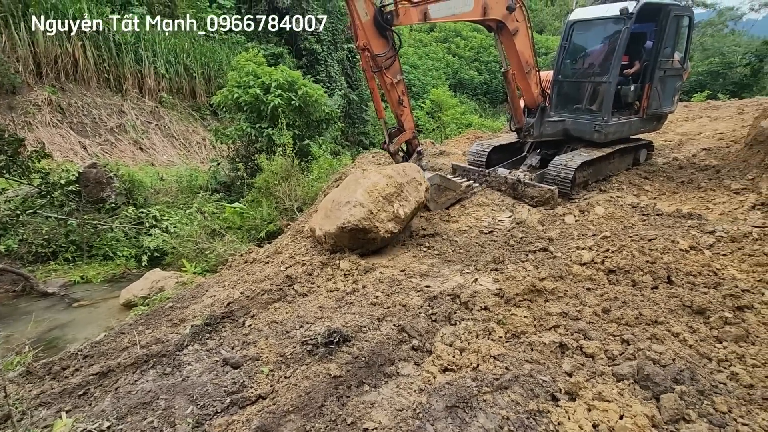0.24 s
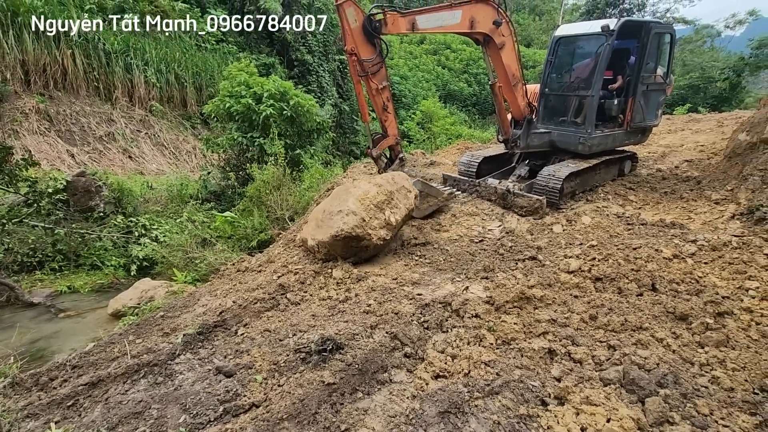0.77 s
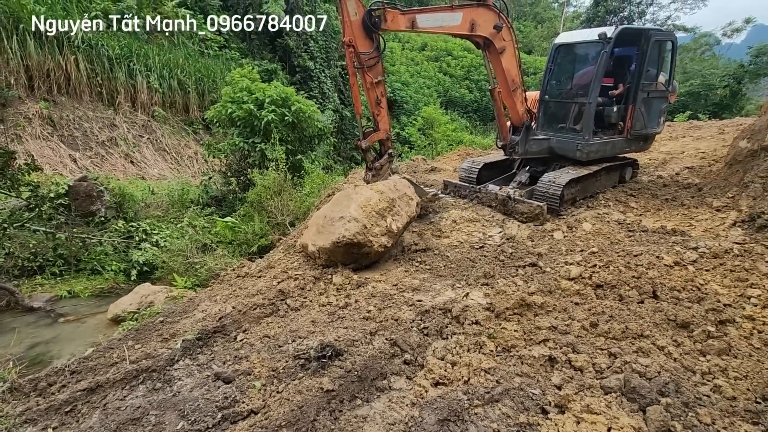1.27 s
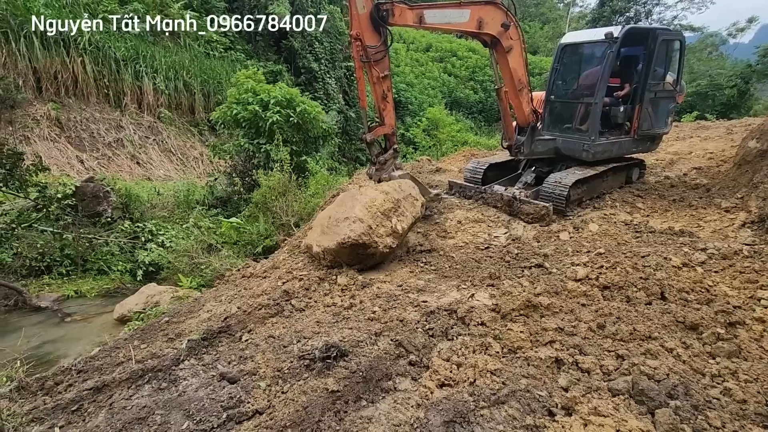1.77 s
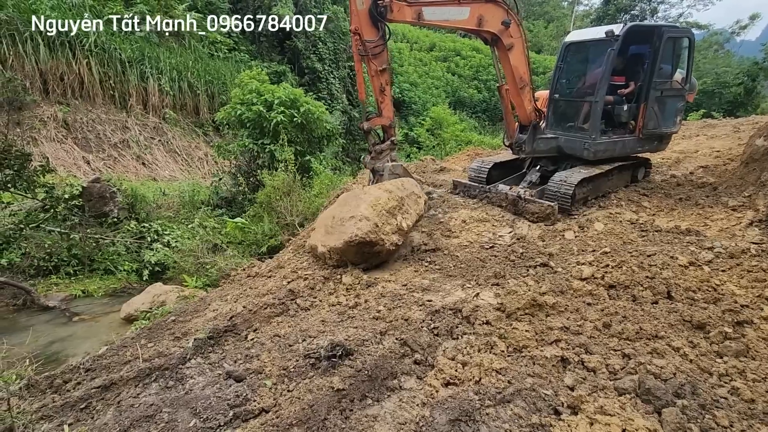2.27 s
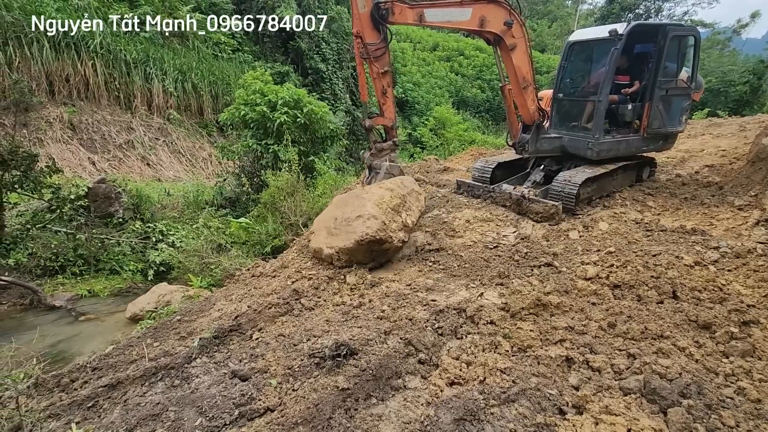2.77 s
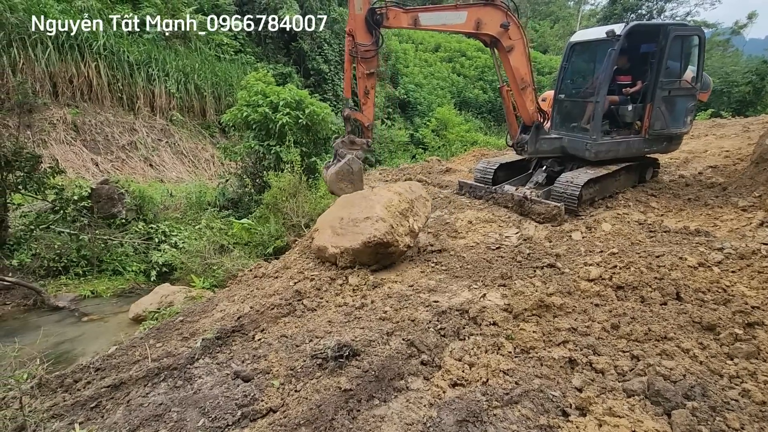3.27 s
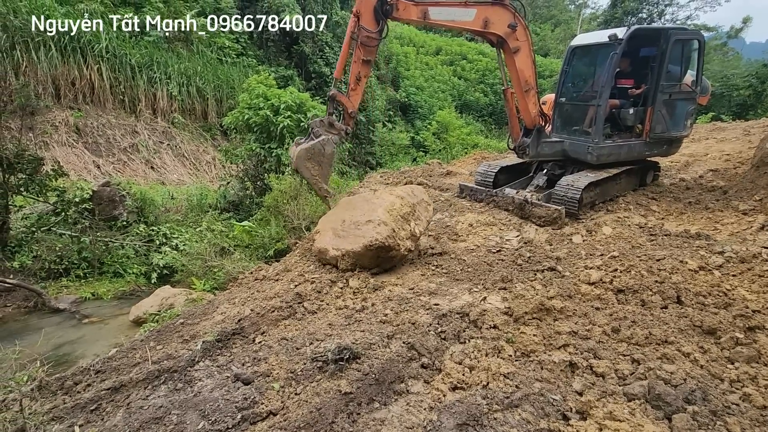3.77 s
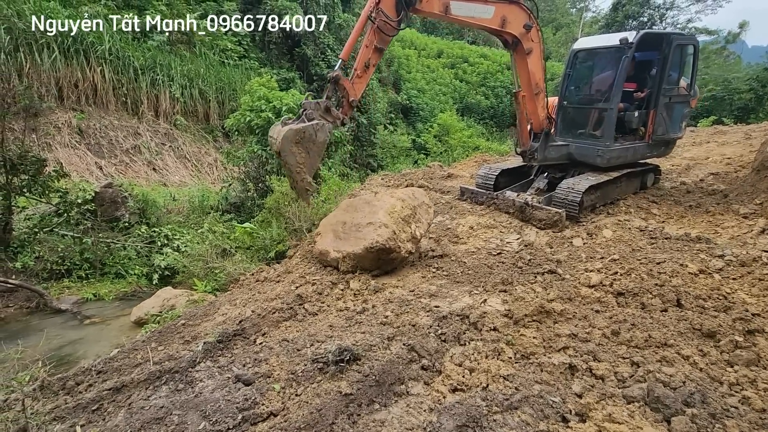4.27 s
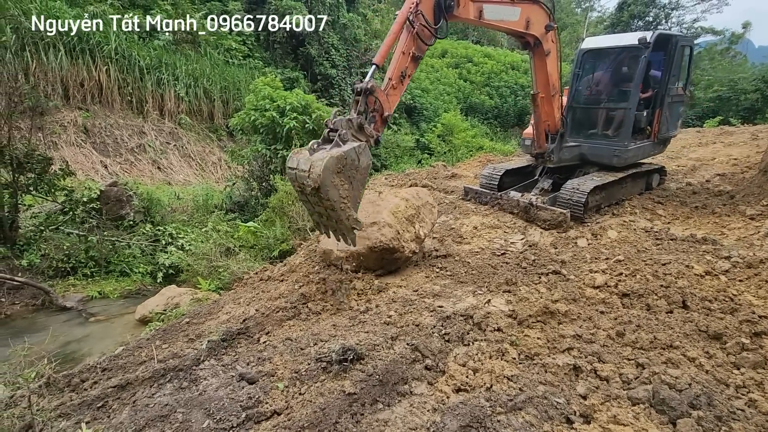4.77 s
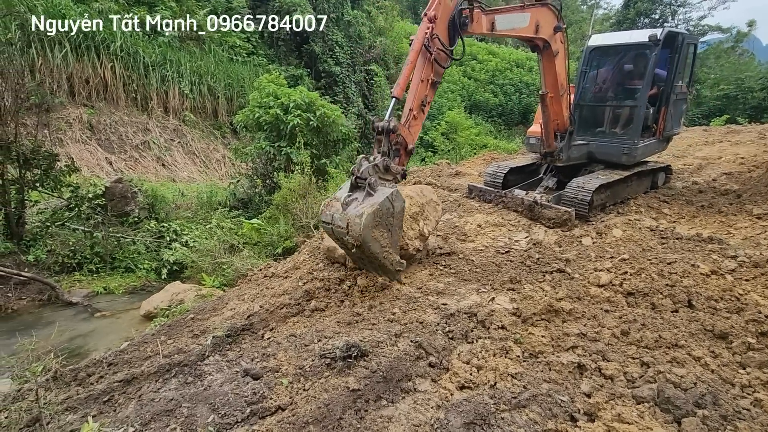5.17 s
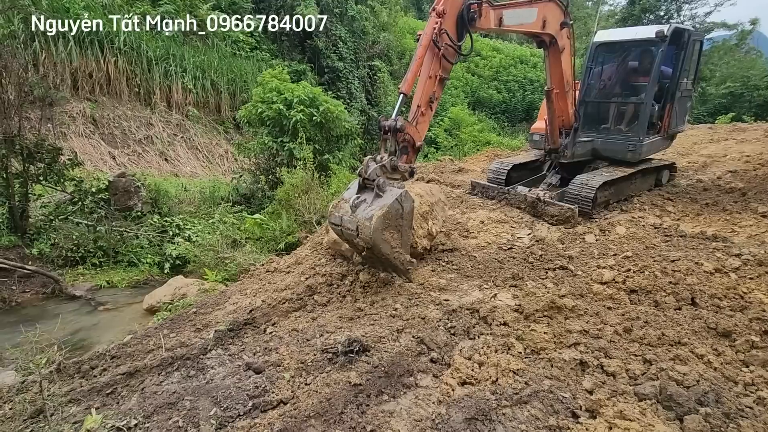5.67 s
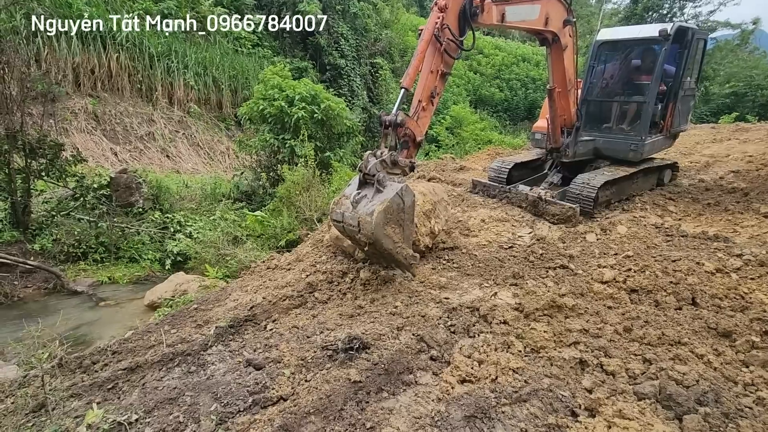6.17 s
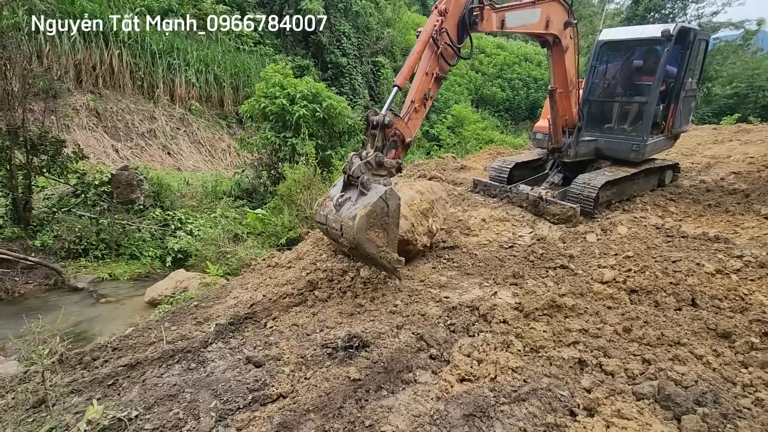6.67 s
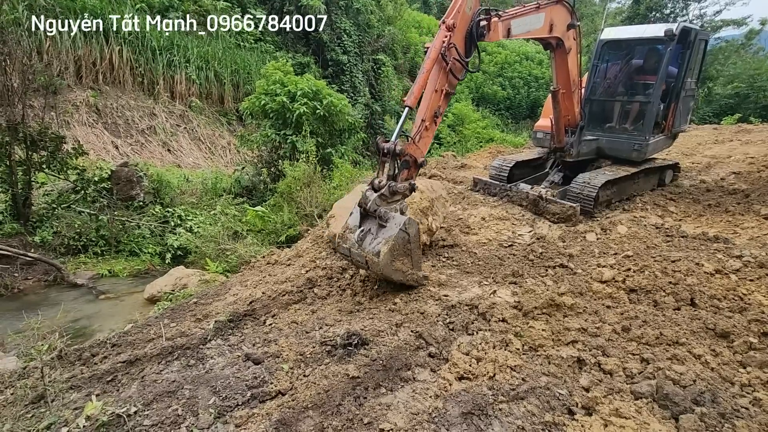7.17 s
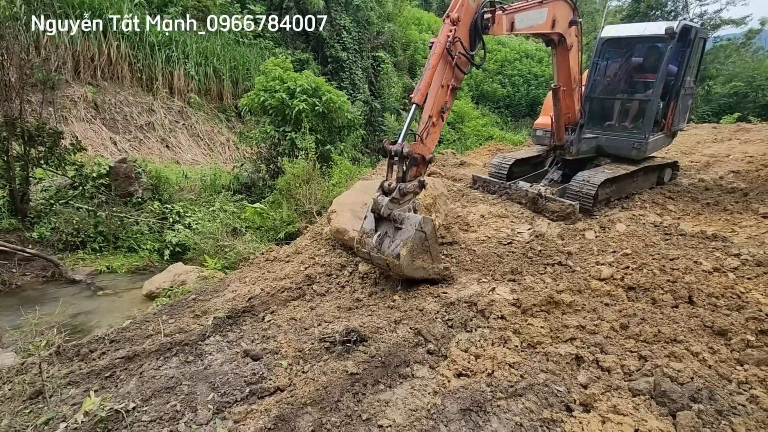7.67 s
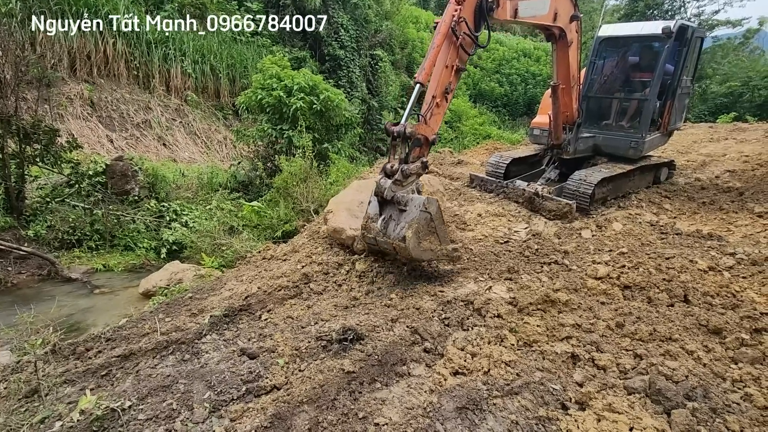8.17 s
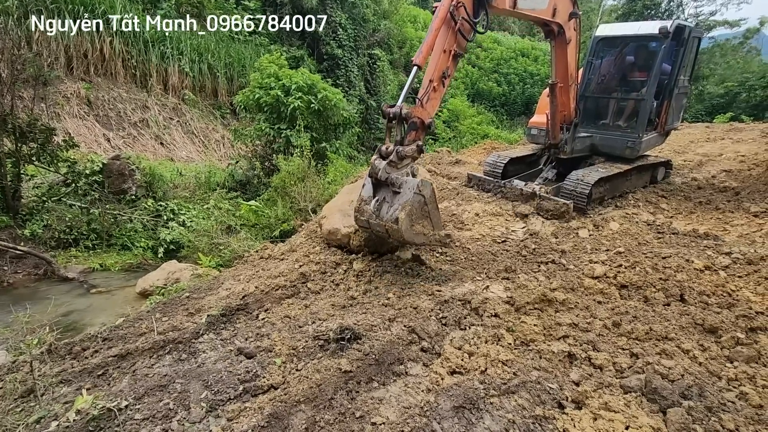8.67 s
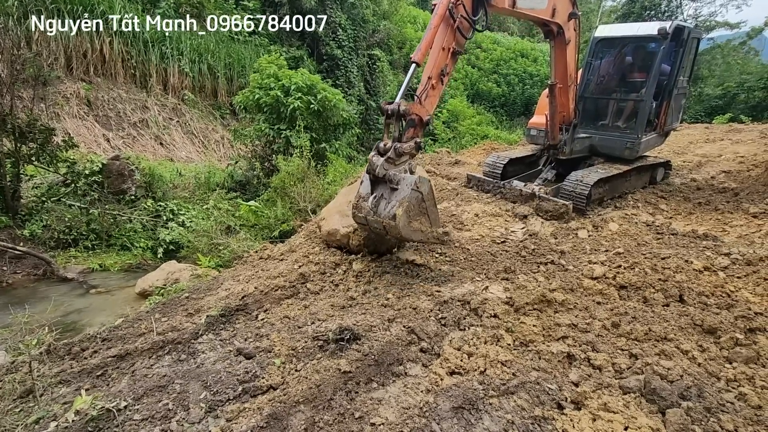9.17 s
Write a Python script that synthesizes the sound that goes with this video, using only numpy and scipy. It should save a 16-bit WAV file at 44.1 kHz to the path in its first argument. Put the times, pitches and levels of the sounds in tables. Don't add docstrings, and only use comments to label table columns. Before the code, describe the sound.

Stone crunches and scrapes on a steel bucket in irregular bursts, dull thumps hitting soil, over a constant low diesel drone and faint water hiss.

```python
import sys
import numpy as np
from scipy import signal
from scipy.fft import rfft, irfft, next_fast_len
from scipy.io import wavfile
from scipy.ndimage import uniform_filter1d

SR = 44100
rng = np.random.default_rng(int(sys.argv[2]) if len(sys.argv) > 2 else 0)


def transcribe(signal):
    frames = np.atleast_2d(signal).T
    limited = np.clip(frames, -1, 1)
    pcm = np.round(limited * 32767).astype(np.int16)
    wavfile.write(sys.argv[1], SR, pcm)


def elevation(decibels):
    levels = np.asarray(decibels, float)
    return 10 ** (levels / 20)


N = 415863

# [start_s, level_db]
EFFORT = [(0, -40), (.45, -46.5), (.89, -32), (1.42, -39.5), (1.7, -42), (2.1, -38.5), (2.55, -41.5),
          (3.31, -40), (4.0, -45), (4.5, -42.5), (5.99, -48), (6.8, -37), (7.01, -41), (8.03, -45),
          (8.2, -22), (8.38, -42.5), (8.74, -51), (9.43, -47.5)]
# [freq_hz, density_db per Hz]
RUMBLE = [(60, -60.5), (90, -39), (120, -4.5), (170, 3), (230, 1.5), (340, -12), (450, -11.5), (600, -34),
          (1500, -100)]


def curve(rows, column):
    rows = np.array(rows)
    return np.interp(np.arange(N) / SR, rows[:, 0], rows[:, column])


def read(points, hz):
    f, value = np.transpose(points)
    return np.interp(np.log(hz + 1), np.log(f + 1), value)


def evened(x):
    return x / np.sqrt(np.mean(x ** 2) + 1e-20)


def add(mix, s, sound):
    part = mix[..., round(s * SR):][..., :sound.shape[-1]]
    part += sound[..., :part.shape[-1]]


def white():
    return rng.standard_normal((2, N))


def wander(rate_hz, channels=1):
    count = N // 16 + 99
    size = next_fast_len(count)
    slope = 1 / (1 + (np.fft.rfftfreq(size, 16 / SR) / rate_hz) ** 4)
    coarse = irfft(rfft(rng.standard_normal((channels, size))) * slope)
    return evened(np.array([np.interp(np.arange(N) / 16, np.arange(len(row)), row) for row in coarse]))


def colour(x, points):
    level_db = read(points, abs(np.fft.fftfreq(8192, 1 / SR)))
    log_gain = np.log(elevation(np.maximum(level_db, -100)))
    taps = np.fft.ifft(np.exp(log_gain - 1j * signal.hilbert(log_gain).imag)).real[:4096]
    return signal.oaconvolve(x, taps[None] / np.linalg.norm(taps), axes=1)[:, :N]


def ring(x, hz, t60):
    r = 1000 ** (-1 / (max(t60, .004) * SR))
    poles = [1, -2 * r * np.cos(2 * np.pi * hz / SR), r * r]
    return np.sqrt((1 - r) / 2) * signal.lfilter([1, 0, -1], poles, x)


def patchy(x, depth_db):
    z = signal.stft(x, nperseg=256, noverlap=128)[2]
    field = rng.standard_normal(z.shape[1:])
    field = uniform_filter1d(uniform_filter1d(field, size=3, axis=0), size=5, axis=1)
    return signal.istft(z * elevation(depth_db * evened(field)), nperseg=256, noverlap=128)[1][:, :N]


def engine():
    # [start_s, firing_hz, level_db of the firing tone]
    running = [(0.0, 90.2, -25), (0.76, 85.0, -19.5), (1.0, 86.8, -23.5), (1.68, 85.8, -22),
               (1.78, 84.7, -21.5), (3.07, 84.66, -21.5), (3.18, 88, -22.5), (4.33, 87.8, -23),
               (4.62, 90.96, -21.5), (5.36, 94.2, -28), (5.67, 85.45, -22.5), (6.77, 92, -23),
               (6.93, 93.5, -28.5), (7.45, 93, -25.5), (7.56, 86.1, -23), (8.09, 83, -19.5),
               (8.19, 82.6, -27), (8.51, 82.6, -22.5)]
    # [multiple of half the firing rate, loaded_db, resting_db]
    orders = [(1, 0.5, -1.5), (1.5, -28, -22), (2, 1, 1), (2.5, -42, -14), (3, -26.5, -26), (4, -24, -34.5),
              (5, -17.5, -53.5), (5.5, -29.5, -41), (6, -34, -24.5), (7, -30, -60), (8, -27, -38),
              (12, -45, -35.5)]
    # [start_s, share 0-1]
    arm_rests = [
        (0, 0),
        (8.4, 0.23),
        (8.8, 0.69),
        (9.43, 0.95),
    ]
    # [start_s, level_db, length_s]
    jolts = [
        (4.6, 4, .06),
        (7.499, -5, 0.064),
        (8.2, -22, .1),
    ]
    half_rate_db, rest_sag_hz = -30, 1.181
    rest = curve(arm_rests, 1)
    firing_hz = curve(running, 1) - rest_sag_hz * rest + .5 * wander(5.51)[0]
    turns = np.cumsum(firing_hz) / (2 * SR)
    waver, out = wander(4.2, channels=4), np.zeros(N)
    half_db = half_rate_db
    for s, db, length in jolts:
        half_db = half_db + db * np.exp(-((np.arange(N) / SR - s) / length) ** 2)
    for i, (k, loaded_db, resting_db) in enumerate(orders):
        level_db = half_db if k == 1 else curve(running, 2)
        level_db = level_db + (1 - rest) * loaded_db + rest * resting_db
        shake = .06 if k in (1, 2) else .5
        tone = np.sqrt(2) * np.cos(2 * np.pi * (k * turns + rng.random()))
        out += elevation(level_db.astype(np.float32)) * (1 + shake * waver[i % 4]) * tone
    return out, turns


def hiss(turns):
    # [freq_hz, density_db per Hz]
    air_spectrum = [(25, -30), (50, 0.5), (110, -4.5), (200, -11.5), (330, -14.5), (480, -22.5), (760, -17),
                    (1200, -23), (1600, -20), (3000, -28.5), (5200, -33), (8000, -40.5), (12000, -48),
                    (16000, -74)]
    gate = 1 + 0.1 * np.cos(4 * np.pi * turns)
    air = colour(white() * gate * elevation(0.77 * wander(45)), air_spectrum)
    air = patchy(air, 1.5)
    middle = signal.sosfilt(signal.butter(4, [500, 6000], "band", fs=SR, output="sos"), air)
    return air / middle.std() * elevation(curve(EFFORT, 1) + 0.5)


def grind():
    effort_share, level_db = 0.86, -5.5
    rumble = colour(white() * elevation(3.2 * wander(6.3)), RUMBLE)
    return rumble * elevation(effort_share * curve(EFFORT, 1) + level_db)


def stream():
    # [freq_hz, density_db per Hz]
    water_spectrum = [(2000, -3), (4000, 1), (5400, -7), (6900, 9.5), (7400, 5), (8400, -1.5),
                      (10800, -6.5), (11600, 1.5), (12600, -2), (16000, -2.5)]
    return elevation(-55.5) * colour(white(), water_spectrum)


def clinks():
    # [freq_hz, level_db, t60_s]
    link_modes = [(7950, -6, .02), (10850, -10, .025), (13400, -21, .02), (14300, -13, .025),
                  (4350, -6, .05), (3150, -10, .02)]
    # [start_s, level_db, low_db of the low modes over the high ones]
    taps = [(.02, -38, 7), (1.1104, -26, -5), (1.155, -34, -4), (1.186, -24.5, -3), (1.2427, -27, 5),
            (1.3548, -34, 2), (1.385, -37.5, 11.5), (1.3982, -36, 6), (1.478, -29, 4), (1.5594, -33.5, 9.5),
            (1.916, -24.5, 6.5), (2.1151, -30, 8), (2.1594, -34, 8), (2.2194, -36, 12), (2.2788, -31.5, 7),
            (2.4886, -40, 14.5), (2.7011, -33, 6), (2.7427, -27, -5), (2.83, -42, 10), (2.09, -42, -10)]
    rattle_t60_s, low_longer, tick_db = .11, 1.8, -17
    t, (hz, db, t60) = np.arange(SR // 5) / SR, np.array(link_modes).T
    low = hz < 6000
    chatter_t60 = (rattle_t60_s * np.where(low, low_longer, 1))[:, None]
    chatter, ticks = np.zeros((len(hz), N)), np.zeros(N)
    for (s, peak_db, low_db), share in zip(taps, rng.standard_normal((len(taps), len(hz)))):
        struck_db = peak_db + db + low_db * low + 3 * share
        add(chatter, s, elevation(struck_db[:, None] - 60 * t / chatter_t60))
        add(ticks, s, elevation(peak_db + tick_db - 60 * t / .03))
    jitter = rng.standard_normal((2, N + 1))
    modes = sum(ring(jitter[:, 1:] * chatter[i], hz[i], t60[i]) for i in range(len(hz)))
    return elevation(-9) * modes + ticks * np.diff(jitter)


def thuds():
    # [start_s, level_db, pitch_hz]
    thumps = [(.062, -10.5, 232.6), (.717, -24.5, 171), (.791, -15.5, 130.5), (.839, -10.5, 180),
              (.898, 5, 168), (.948, -11, 157), (1.031, -12.5, 210.3), (1.093, -6, 174.6),
              (1.262, -23.5, 220), (1.349, -23, 187.2), (1.631, -22.5, 220), (1.713, -17.5, 175),
              (1.994, -17, 169.8), (2.046, -5, 162), (2.153, -8, 172.6), (2.224, -19.5, 206.3),
              (2.614, -19.5, 176.2), (2.954, -10, 186.5), (3.11, 0, 193), (3.18, -7, 197),
              (3.319, -25.5, 213), (3.469, -20, 169.6), (3.683, -27.5, 232), (4.665, -26, 222.4)]
    # [start_s, level_db, pitch_hz]
    later_thumps = [(5.25, -4, 150), (5.287, -6, 153), (5.342, -23.5, 165), (5.818, -27.5, 175.7),
                    (6.279, -19.5, 167), (6.426, -16, 160), (6.688, -23, 152.6), (6.7, -22, 233),
                    (6.805, -16, 223), (6.835, -22, 225), (6.9, -29, 211), (6.95, -26, 199), (7.365, -23, 159),
                    (7.432, 5, 153), (7.994, -20, 168), (8.072, -12, 154), (8.145, 7.5, 188), (8.169, -2, 203.5),
                    (8.258, -12, 199)]
    # [start_s, level_db]
    booms = [
        (3.5, -17),
        (6.87, -19),
        (6.84, -26),
        (7.448, -4),
        (8.307, -15.5),
        (8.35, -22.5),
        (7.17, -30.5),
        (3.3, -25),
        (7.47, -16),
    ]
    boom_hz, boom_shorter = 340.2, .6
    thud_t60_s, shorter_s_per_db = 0.12, 0.01
    t, out, puff = np.arange(SR // 3) / SR, np.zeros(N), np.zeros(N)
    blows = [*thumps, *later_thumps, *((s, db, boom_hz) for s, db in booms)]
    for (s, db, hz), (ratio, phase) in zip(blows, rng.random((len(blows), 2))):
        t60 = (thud_t60_s - shorter_s_per_db * db) * (boom_shorter if hz == boom_hz else 1)
        onset = np.sin(np.pi / 2 * np.minimum(t / 0.0054, 1)) ** 2
        shape = elevation(db - 60 * t / max(t60, .02)) * onset
        neighbour = np.sin(2 * np.pi * (hz * (0.88 + 0.287 * ratio) * t + phase))
        add(out, s, shape * (np.sin(2 * np.pi * hz * t) + 0.41 * neighbour))
        add(puff, s, shape)
    return out + 0.33 * colour(white() * puff, RUMBLE)


def rings():
    # [start_s, level_db, pitch_hz, t60_s]
    singing = [
        (0.066, -23.5, 429, 0.19),
        (1.27, -33, 2170, 0.14),
        (3.435, -12, 495, 0.056),
        (5.252, -4, 480, 0.15),
        (5.289, 0.5, 2500, 0.042),
        (5.36, -37.5, 637, 0.97),
        (8.0, -27.5, 351, 0.46),
        (8.36, -47, 632, 0.75),
    ]
    out, t = np.zeros(N), np.arange(SR) / SR
    for s, db, hz, t60 in singing:
        add(out, s, elevation(db - 60 * t / t60) * (1 - np.exp(-t / 0.0024)) * np.sin(2 * np.pi * hz * t))
    return out * (1 + .35 * wander(30, channels=2))


def pebbles(pressure):
    out, t = np.zeros((2, N)), np.arange(600) / SR
    for hz in np.geomspace(600, 5500, 14):
        pings = elevation(-60 * t * hz / 30) * np.sin(2 * np.pi * (hz * t + [[0], [rng.random()]]))
        for when, size in rng.random((200, 2)):
            add(out, when * N / SR, -np.log(1 - size) * pressure[int(when * N)] * pings)
    return out


def crunches():
    # [start_s, body_db, grit_db over the body, t60_s]
    cracks = [(.405, -19.5, -5.5, 0.17), (.837, -7.5, -6, 0.33), (.903, -6, -3, 0.18),
              (1.14, -22, -6, 0.36), (3.125, -5.5, -7.5, 0.3), (3.686, -24, -6, 0.17),
              (4.043, -32, -11, .11), (4.669, -18, -14, .22), (5.285, -0.5, -6, 0.1),
              (5.322, -7, -16, 0.19), (1.1, -17, -4.5, 0.15), (6.912, -22, -15, 0.074),
              (6.522, -14.5, -10, 0.17), (6.69, -12.5, -6, 0.18), (6.74, -19.5, -7, 0.13),
              (6.829, -9, -24, .063), (6.938, -18, -1.5, 0.15), (7.304, -20.5, -3, 0.093),
              (7.993, -25.5, -17, 0.26), (8.168, -2.5, -7, 0.2), (8.35, -23, -5, 0.15),
              (9.256, -25, -7, 0.13)]
    crushes = [(.073, -14.5, -4, 0.14), (1.262, -31.5, -1, 0.58), (2.153, -19, -15.5, 0.42),
               (2.976, -22.5, -9.5, 0.16), (3.017, -23.5, -7, 0.17), (3.433, -16.5, -20, 0.23),
               (3.468, -18, -12.5, .13), (3.96, -24.5, -37, .16), (4.526, -29, -6, 0.22),
               (5.2505, -4, -6.5, 0.23), (5.435, -30, -9, 0.2), (5.78, -27.5, -25, 0.069),
               (5.823, -21.5, -20, 0.12), (5.844, -25.5, -18, .26), (6.228, -26, -15, .16),
               (6.413, -7.5, -7.5, 0.2), (6.635, -21, -15, 0.18), (6.898, -15.5, -19, 0.08),
               (7.122, -36, -8, 0.073), (7.356, -17.5, -16, 0.16), (7.447, -9.5, -6.5, 0.19),
               (8.152, -3.5, -12, 0.077), (8.242, -19, 2, 0.2), (8.267, -15.5, 1.5, 0.17),
               (8.575, -31.5, -15, 0.16), (8.94, -32.5, -13, 0.12), (9.332, -31, -8, 0.074)]
    drags = [(1.995, -28, -11, .14), (2.023, -19.5, -11.5, 0.26), (2.09, -27, -10.5, 0.67),
             (2.643, -31, -5.5, 0.33), (2.707, -30, -6, 0.77), (3.111, -15.5, 1, .07),
             (3.202, -12.5, -4.5, 0.18), (3.289, -25, -11, 0.56), (6.25, -9, -7.5, 0.22),
             (6.49, -24.5, -2.5, .17), (7.43, -2.5, -12, .073), (8.309, -18.5, -10.5, 0.26)]
    creeps = [
        (.805, -16.5, -15, .19),
        (1.022, -19.5, -10, 0.092),
        (6.372, -8.5, -14, 0.071),
        (6.768, -7, -6, 0.26),
        (7.155, -24.5, -14, 0.17),
        (8.072, -12.5, -11.5, 0.4),
    ]
    # [freq_hz, density_db per Hz]
    body_spectrum = [(150, -19.5), (250, -5), (344, -2), (416, -9), (481, -4.5), (532, -8.5), (823, -2.5),
                     (1020, -9), (2200, -12), (2860, -50), (4840, -120)]
    grit_spectrum = [(900, -32.5), (1400, 9.5), (1900, -4.5), (2500, -3), (3300, -2), (4200, -2.5),
                     (6000, -22.5), (9000, -19), (16000, -68)]
    top_spectrum = [(3500, -17), (5500, 16), (7500, 7.5), (9500, -4.5), (12000, 2.5), (16000, -15)]
    # [freq_hz, level_db, t60_s]
    plates = [(345, -3, .12), (480, -8, .13), (630, -3, .08), (765, -5, .08), (945, -4, .08),
              (1344, -6, .09), (2290, 0, .05), (2530, -1, .045), (3055, -1, .035), (8510, -15, .14),
              (5200, -17, .09), (6640, -17, .1), (13360, -27, .16), (15080, -24, .2)]
    creep_s, creep_start = .027, .12
    kinds = ((cracks, 0.01), (crushes, 0.018), (drags, .029), (creeps, creep_s))
    spot_low_hz, spot_high_hz = 480, 950
    top_growth, top_faster = 1.17, 1.25
    top_lag = 0.0068

    t, power, notes = np.arange(SR // 4) / SR, np.zeros((3, N)), np.zeros((2, N))
    hits = (rng.random(N) < 160 / SR) * np.minimum(rng.exponential(0.55, N), 1.2)
    snaps = signal.lfilter([1], [1, -.975], hits)
    unevenness = elevation(1.24 * wander(144)) * (1 + snaps)
    grains = evened(rng.standard_normal((2, 2, N)) * unevenness)
    contacts = [(*row, hold) for rows, hold in kinds for row in rows]
    spots_hz = spot_low_hz + (spot_high_hz - spot_low_hz) * rng.random(len(contacts))
    for (s, db, grit_db, t60, hold), hz in zip(contacts, spots_hz):
        sudden = creep_start if hold == creep_s else np.exp(-hold / 0.039)
        swell = np.minimum(sudden + t / max(hold, .001), 1) * (1 - np.exp(-t / 0.00045))
        swell = swell + sudden * np.exp(-t / 0.0019)
        shape = swell * elevation(-60 * np.maximum(t - hold, 0) / max(t60, .01))
        top_db = top_growth * db + 1.92 * grit_db - 9.5
        levels_db = [[db - 10.0], [db + grit_db - 4.0], [top_db]]
        add(power, s, (elevation(levels_db) * [shape, shape, shape ** top_faster]) ** 2)
        drive = grains[0, :, round(s * SR):][:, :len(t)]
        add(notes, s, elevation(db - 25) * ring(drive * shape[:drive.shape[1]], hz, 0.06))
    body, grit, top = np.sqrt(power)
    dust = signal.lfilter([top_lag], [1, top_lag - 1], top)
    out = colour(grains[0] * body, body_spectrum)
    out = out + colour(grains[1] * grit, grit_spectrum)
    out = out + colour(grains[0] * dust, top_spectrum)
    contact = elevation(4.5 * wander(15, channels=4))
    for i, (hz, db, t60) in enumerate(plates):
        push = body if hz < 1600 else grit
        notes += elevation(db - 11.5) * ring(grains[0] * contact[i % 4] * push, hz, t60)
    return notes + patchy(out, 2.8) + .7 * pebbles(grit)


def chips():
    # [start_s, level_db, pitch_hz]
    bursts = [(.837, -20, 3060), (.842, -11, 1050), (.915, -19, 5900), (1.157, -25, 2130),
              (3.125, -20, 2500), (6.252, -20, 940), (6.273, -21, 2900), (6.292, -35, 7950),
              (6.376, -22, 3080), (6.394, -20, 900), (6.415, -10.5, 2800), (6.498, -22, 2770),
              (6.52, -24, 2840), (6.529, -27, 4620), (6.691, -19, 2520), (6.741, -19, 2310),
              (6.79, -13, 2315), (6.81, -15, 780), (6.913, -25, 1600), (6.939, -15, 3230),
              (7.306, -20, 2696), (7.31, -23, 3420), (7.367, -24, 930), (7.445, -10, 3242),
              (7.994, -30, 890), (8.093, -23, 2430), (8.16, -18, 3130), (8.172, -13, 2500),
              (8.183, -12, 3070), (8.243, -27, 2600), (3.207, -16, 2300), (5.326, -11, 940),
              (5.29, -15, 3300), (4.672, -25, 1490), (9.257, -36, 1980), (5.782, -31, 800)]
    # [start_s, level_db]
    edge_snaps = [(.406, -30), (.837, -26), (1.102, -32), (3.111, -24), (4.587, -34), (5.251, -23),
                  (6.25, -33), (6.384, -27), (6.414, -25), (6.69, -26), (6.74, -32), (6.913, -37),
                  (6.938, -25), (7.304, -35), (7.357, -39), (7.431, -36), (7.995, -27), (8.151, -24),
                  (8.16, -22), (8.172, -15), (8.243, -26), (9.256, -30.5), (9.334, -35), (4.671, -36)]
    chip_t60_s, snap_t60_s = .09, .025
    t, out, edge = np.arange(SR // 8) / SR, np.zeros((2, N)), np.zeros(N)
    for (s, db, hz), noise in zip(bursts, rng.standard_normal((len(bursts), 2, len(t)))):
        shape = elevation(db - 3 - 60 * t / chip_t60_s) * (1 - np.exp(-t / .001))
        add(out, s, evened(ring(noise, hz, .025)) * shape)
    for s, db in edge_snaps:
        add(edge, s, elevation(db - 60 * t / snap_t60_s))
    return out + signal.lfilter([.5], [1, -.5], white() * edge)


def squeak():
    # [start_s, level_db]
    bite = [
        (.94, -60),
        (.985, -31),
        (1.02, -33),
        (1.045, -19),
        (1.07, -24.5),
        (1.1, -30),
        (1.2, -60),
    ]
    return elevation(curve(bite, 1)) * evened(ring(white(), 800, .07))


def scene():
    hum, turns = engine()
    hum = hum * (1 + 0.054 * wander(52))
    machine = hum + hiss(turns) + grind()
    return machine + stream() + clinks() + thuds() + rings() + crunches() + chips() + squeak()


def low_pass(x):
    return signal.sosfilt(signal.butter(12, 15930, fs=SR, output="sos"), x)


def record(dry):
    # [freq_hz, left minus right_db]
    tilt_table = [(60, 1.5), (110, 0.5), (200, 1.5), (380, 1), (700, 2.5), (1290, 2.5), (2380, -2),
                  (4400, -4.5), (8120, -0.5), (15000, 0)]
    # [freq_hz, likeness 0-1]
    likeness = [(100, .999), (250, .91), (500, .92), (1000, .62), (2000, .55), (4000, .48), (12000, .33)]
    port_gap_s = 16.5 / 44100
    wrap_hz = 792
    size = next_fast_len(N + 999)
    hz, (direct, twin) = np.fft.rfftfreq(size, 1 / SR), rfft(dry, size)
    same, tilt = np.clip(read(likeness, hz), 0, 1), elevation(read(tilt_table, hz) / 2)
    lag = 2 * np.pi * hz * port_gap_s * np.clip(hz / wrap_hz - 1, .24, 1)
    edges = 1 / (1 + (29 / (hz + 1)) ** 6) * (hz < 15850)
    right = (same * direct + np.sqrt(1 - same ** 2) * twin) * np.exp(-1j * lag)
    ports = irfft(np.array([direct * tilt, right / tilt]) * edges, size)[:, :N]
    power = uniform_filter1d((ports ** 2).mean(0), 500, origin=200)
    power_db = 10 * np.log10(abs(power) + 1e-12)
    fall = np.arange(N) * 275.0 / SR
    over_db = np.maximum(np.maximum.accumulate(power_db + fall) - fall + 19.5, 0)
    ducked = ports / elevation(0.41 * uniform_filter1d(over_db, size=200, origin=90))
    return low_pass(np.clip(ducked, -.95, .95))


dry = scene()
out = record(dry)
transcribe(out)
```